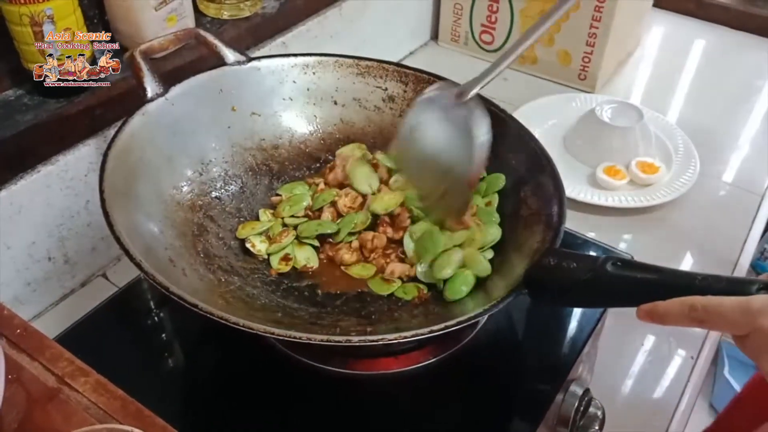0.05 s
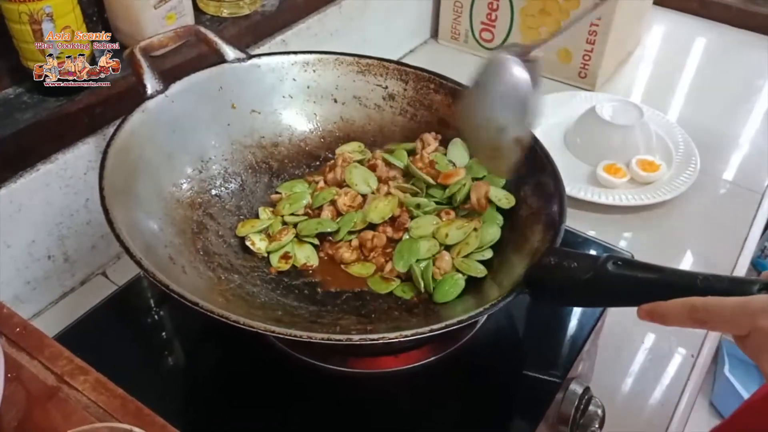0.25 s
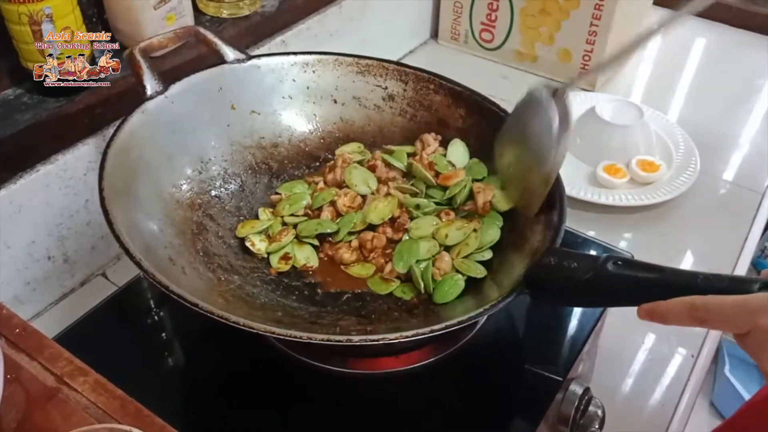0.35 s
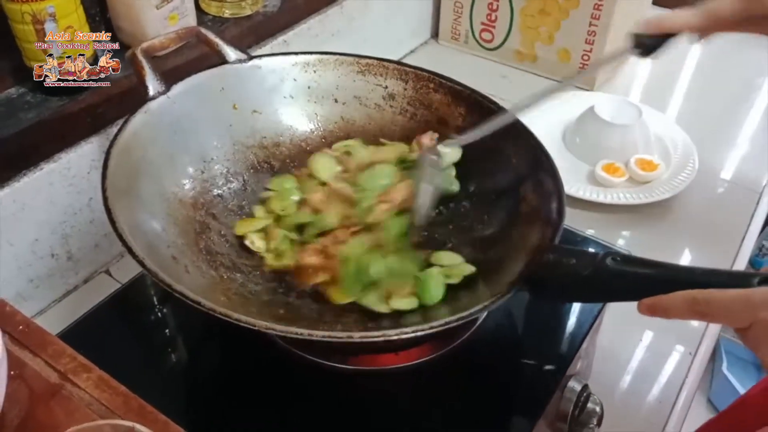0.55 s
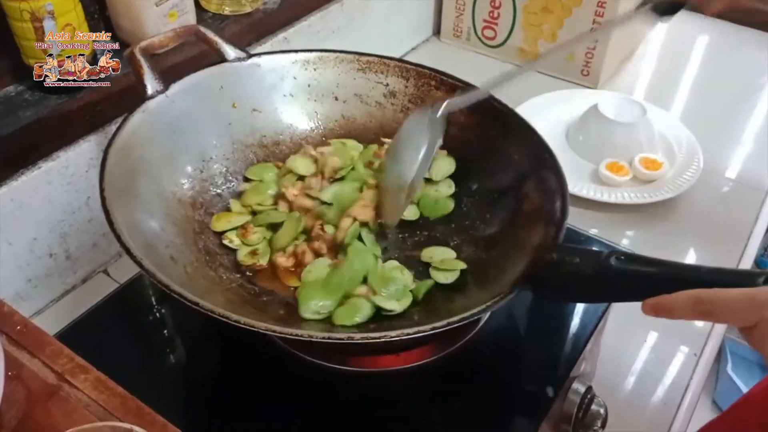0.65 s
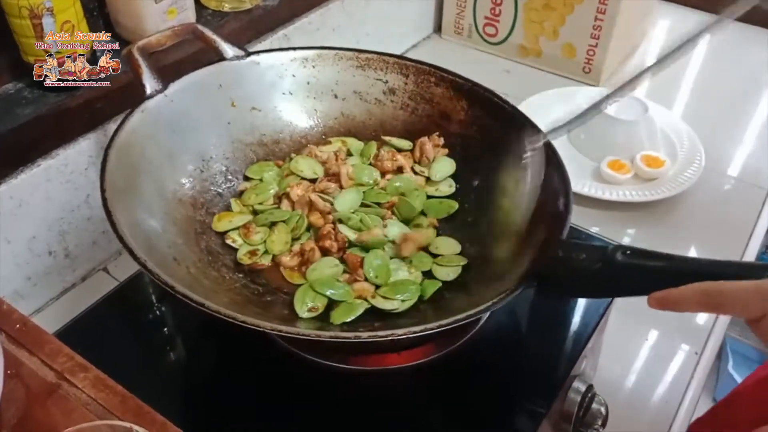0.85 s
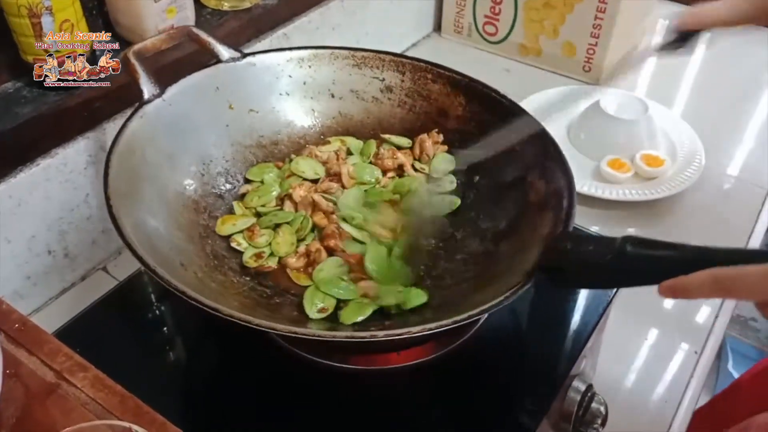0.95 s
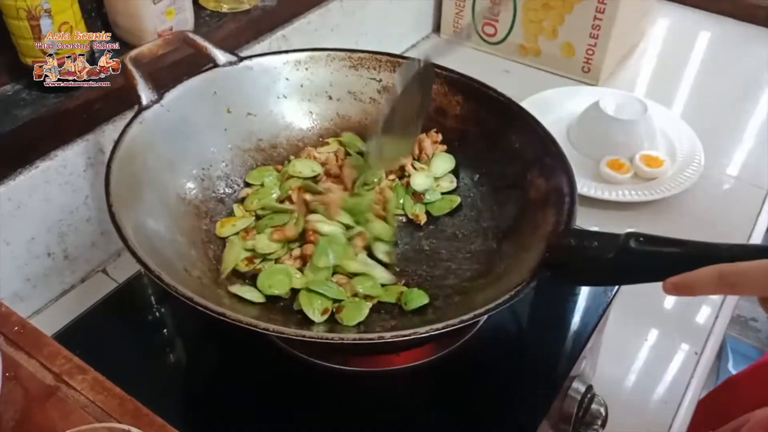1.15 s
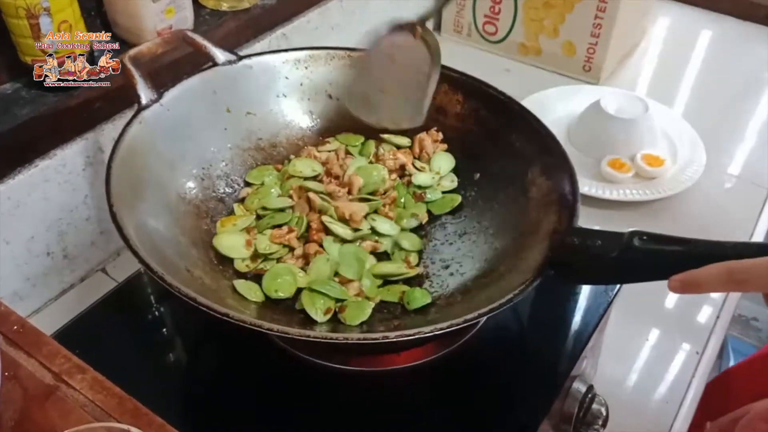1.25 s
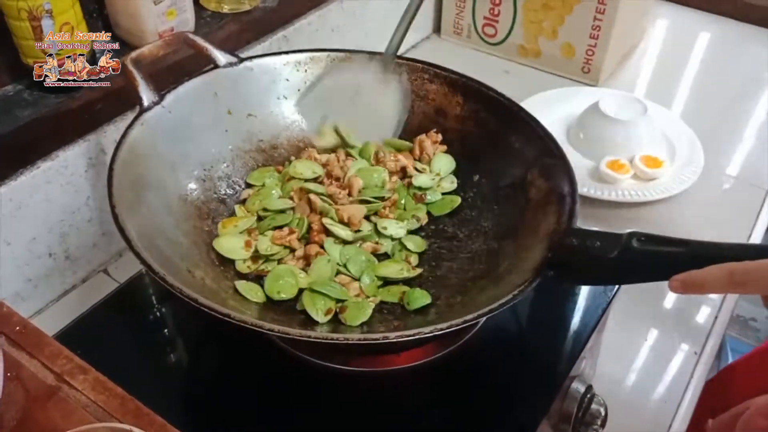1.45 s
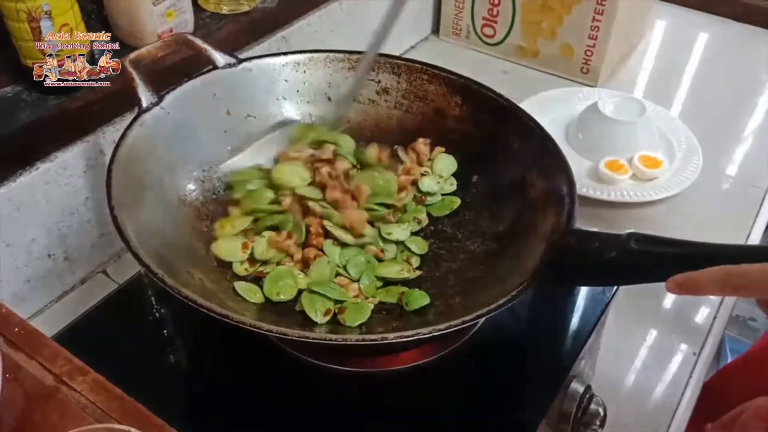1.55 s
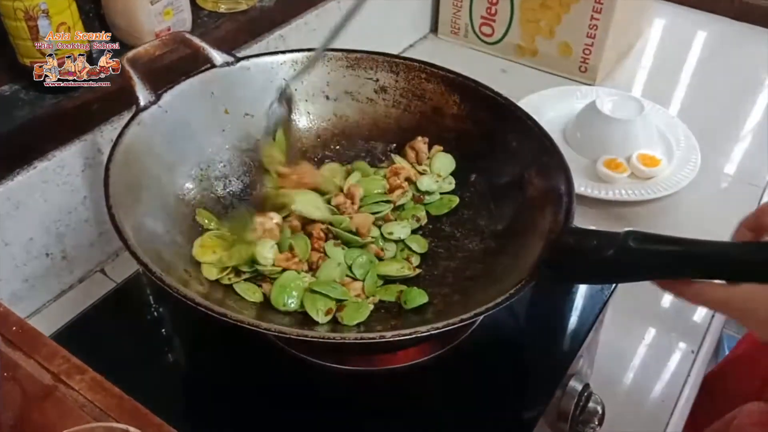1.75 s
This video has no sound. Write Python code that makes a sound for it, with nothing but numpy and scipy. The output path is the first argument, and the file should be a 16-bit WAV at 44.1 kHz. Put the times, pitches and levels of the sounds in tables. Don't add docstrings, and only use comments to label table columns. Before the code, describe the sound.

A metal spatula clanks and scrapes in a hot wok over a faint sizzle in a kitchen

```python
import sys
import numpy as np
from scipy import signal
from scipy.fft import rfft, irfft
from scipy.io import wavfile
from scipy.ndimage import uniform_filter1d

SR = 44100
rng = np.random.default_rng(int(sys.argv[2]) if len(sys.argv) > 2 else 0)


def volts(x):
    e = np.asarray(x, float) / 20
    return 10 ** e


def wav_record(signal):
    frames = np.transpose(np.atleast_2d(signal))
    bounded = np.clip(frames, -1, 1)
    quanta = np.round(bounded * 32767).astype(np.int16)
    wavfile.write(sys.argv[1], SR, quanta)


N = 79380


def evened(x):
    return x / np.sqrt(np.mean(x ** 2) + 1e-20)


def read(points, hz):
    f, value = np.transpose(points)
    return np.interp(np.log(hz + 1), np.log(f + 1), value)


def add(mix, start_s, sound):
    part = mix[round(start_s * SR):][:len(sound)]
    part += sound[:len(part)]


def coloured(x, points):
    gain_db = read(points, np.fft.rfftfreq(len(x), 1 / SR))
    return irfft(rfft(x) * volts(gain_db), len(x))


def drift(size):
    smooth = uniform_filter1d(rng.standard_normal(N), size)
    return evened(uniform_filter1d(smooth, size))


def resonate(x, hz, width_hz):
    r = np.exp(-np.pi * width_hz / SR)
    pole = r * np.exp(2j * np.pi * hz / SR)
    return 2 * signal.lfilter([1 - r], [1, -pole], x).real


def resonate_twice(x, hz, width_hz):
    return resonate(resonate(x, hz, width_hz), hz, width_hz)


def modes(hz, db, t60_s, size=22050):
    t = np.arange(size)[:, None] / SR
    sines = np.sin(2 * np.pi * (hz * t + rng.random(len(hz))))
    return (sines * volts(-60 * t / t60_s)) @ volts(db)


def crowd(count):
    u = (np.arange(count) + rng.random(count)) / count
    return 150 + 16400 * u ** 1.5, 5 * np.log10(u + .01)


def flattened(body):
    z = rfft(body)
    power = uniform_filter1d(abs(z) ** 2, size=25)
    return evened(irfft(z / np.sqrt(power + 1e-9), len(body)))


def blows():
    # start_s, peak_db, dull_share (0-1), ring_factor
    landings = [
        (0.2444, -1, 0.21, 0.19),
        (0.2508, -2.5, 0.46, 0.88),
        (0.7653, -1, 0.04, 0.25),
        (.772, -9.5, 0.86, 0.59),
        (1.1496, -2, 0.93, 0.65),
        (1.298, -2.5, 0.06, 0.49),
    ]
    spots = [0, 0, 1, 1, 2, 3]
    # freq_hz, level_db
    spot_modes = [
        [(680, -31.5), (1292, -33.5), (2670, -30), (6724, -24.5), (8796, -21), (9808, -18), (11493, -18.5)],
        [(632, -36), (1360, -45), (2950, -28), (1720, -27), (4900, -31), (6780, -26.5), (8177, -28),
         (9200, -23)],
        [(276, -33.5), (312, -35), (396, -36.5), (520, -42), (710, -21.5), (785, -28), (1090, -33), (1282, -24),
         (1340, -22), (1640, -30), (1710, -20), (2700, -22), (6385, -41), (6530, -20.5), (9044, -22.5)],
        [(307, -34), (760, -30), (1290, -28.5), (2271, -22.5), (4608, -30), (6525, -25)],
    ]
    # freq_hz, level_db_per_hz
    bright = [(100, -27), (400, -9.5), (1100, -7.5), (3800, -6.5), (9400, -1.5), (14500, 0.5), (15800, -31),
              (16500, -45)]
    # freq_hz, level_db_per_hz
    dull = [(100, -18), (250, -7), (700, -3), (1800, -8), (2100, -19.5), (6500, -9), (12500, -12),
            (16500, -22)]
    # freq_hz, t60_s
    bowl_ring = [(200, 0.37), (700, 0.32), (2000, 0.38), (5000, 0.23), (9000, 0.21), (15200, 0.04),
                 (15700, 0.018)]
    # freq_hz, factor
    line_ring = [(300, 1.28), (3000, 0.3), (6000, 0.62), (12000, 0.45)]
    # freq_hz, gain_db
    below_top = [(15400, 0), (15700, -70)]
    modes_db, crack_db, crack_s, top_s = -2.5, -2.5, 0.014, 0.004
    out, t = np.zeros(N), np.arange(11025) / SR
    for (start_s, peak_db, dull_share, ring), spot in zip(landings, spots):
        hz, even_db = crowd(count=450)
        colour_db = (1 - dull_share) * read(bright, hz) + dull_share * read(dull, hz)
        mode_db = colour_db + even_db + 2.5 * rng.standard_normal(len(hz))
        t60_s = ring * read(bowl_ring, hz) * rng.uniform(.4, 1.1, len(hz))
        body = modes(hz, mode_db, t60_s, size=len(t))

        line_hz, line_db = np.transpose(spot_modes[spot])
        line_t60_s = ring * read(line_ring, line_hz) * read(bowl_ring, line_hz)
        lines = modes(line_hz, line_db, line_t60_s, size=len(t))

        noise = coloured(rng.standard_normal(len(t)), np.transpose([hz, colour_db]))
        crack = evened(noise) * np.exp(-t / crack_s)

        sound = body / body[:900].std() + volts(modes_db) * lines / lines[:900].std() + volts(crack_db) * crack
        low = coloured(np.minimum(t / 0.0013, 1) ** 2 * sound, below_top)
        top = np.minimum(t / 0.0018, 1) ** 2 * sound - low
        add(out, start_s - .0008, volts(peak_db - 17.0) * (low + top * np.exp(-t / top_s)))
    return out


def drags():
    # time_s, level_db
    pressures = [
        [(.26, -29), (.31, -27), (.325, -22), (.39, -23.5), (.42, -30.5), (.47, -47.5), (.56, -65)],
        [(.775, -30), (.80, -28), (.85, -26), (.88, -33), (.92, -82), (.99, -80)],
        [(1.305, -35), (1.34, -27), (1.39, -23.5), (1.42, -30.5), (1.45, -33.5), (1.52, -42), (1.58, -93)],
    ]
    # freq_hz, level_db_per_hz
    colours = [
        [(59, -64), (100, -37), (291, -9.5), (1960, -8.5), (2800, -6), (3460, -9.5), (15000, -7.5)],
        [(100, -27), (300, 0.5), (1400, -4.5), (2800, -6), (9400, -4.5), (15000, -14)],
        [(100, -29), (300, -10), (650, -5.5), (1500, -8.5), (3000, -6.5), (6500, -1.5), (15000, -5.5)],
    ]
    # freq_hz, width_hz, level_db
    sung_modes = [
        [(1290, 100, -19), (1700, 140, -9), (297, 29, -1), (2810, 82, -26), (7600, 2900, 12)],
        [(557, 27, -27), (1520, 300, -7), (4540, 2200, 0), (8430, 270, -2), (8900, 200, -9)],
        [(306, 120, -10), (624, 66, 20.5), (1620, 26, 17), (6340, 130, 25.5), (8350, 140, -2)],
    ]
    slips_per_s, slip_spread_db, chatter_db = 8000, 3.2, 1.1
    drag_t60_s, sing_db = 0.03, -10.5
    out, t = np.zeros(N), np.arange(N) / SR
    for pressure, colour, sung in zip(pressures, colours, sung_modes):
        time_s, level_db = np.transpose(pressure)
        size_db = slip_spread_db * np.minimum(rng.exponential(1, N), 3)
        slips = volts(size_db) * (rng.random(N) < slips_per_s / SR)
        slips = slips * rng.choice([-1., 1.], N) * volts(chatter_db * drift(size=300))

        hiss = np.zeros(N)
        for k in range(3):
            hz, even_db = crowd(count=300)
            mode_db = even_db + 2.2 * rng.standard_normal(len(hz))
            body = modes(hz, mode_db, drag_t60_s, size=3072)
            at_spot = slips * np.cos(np.pi * (11 * t + k / 3))
            hiss += signal.oaconvolve(at_spot, flattened(body))[:N]

        song = np.zeros(N)
        for hz, width_hz, db in sung:
            tone = evened(resonate_twice(slips, hz, 1.04 * width_hz))
            song += volts(db + 2.7 * drift(size=700)) * tone

        gate = np.clip(np.minimum(t - time_s[0], time_s[-1] - t) / 0.03, 0, 1)
        scrape = evened(coloured(hiss, colour)) + volts(sing_db) * evened(song)
        out += gate * volts(np.interp(t, time_s, level_db)) * scrape
    return out


def squeals():
    # start_s, length_s, freq_hz, level_db
    catches = [(0.244, 0.016, 1790, -27.5), (0.248, 0.0089, 460, -34), (.247, 0.015, 660, -29.5),
               (.253, .014, 1107, -31), (.254, 0.019, 2036, -34), (.258, 0.024, 2666, -34.5),
               (.262, 0.041, 1290, -33), (0.281, 0.011, 748, -31.5), (0.306, 0.0073, 2660, -37),
               (0.308, 0.016, 757, -32), (0.317, 0.015, 1290, -34.5), (.32, .026, 2465, -32.5),
               (0.347, 0.025, 2299, -31), (0.348, 0.014, 2940, -44), (0.367, 0.034, 1715, -38.5),
               (.38, 0.0225, 498, -39.5), (0.766, 0.01, 1280, -26.5), (.782, 0.0093, 1654, -34),
               (.785, 0.016, 640, -36.5), (0.795, 0.023, 1420, -33), (0.821, 0.018, 1617, -34),
               (0.838, 0.006, 1330, -30), (.865, 0.0047, 498, -33.5), (0.879, .003, 3100, -32),
               (.772, 0.035, 8177, -40.5), (1.359, 0.039, 6340, -39), (1.368, .03, 8350, -42),
               (1.302, 0.0079, 2600, -32.5), (1.39, 0.017, 3250, -47.5), (0.247, 0.01, 9050, -22),
               (.325, 0.045, 6750, -35.5), (.32, 0.036, 11500, -40), (1.299, 0.014, 2337, -28),
               (1.30, 0.013, 761, -31.5), (1.315, 0.0079, 2270, -32), (1.322, 0.0082, 1290, -28),
               (1.326, 0.016, 307, -32), (1.332, 0.026, 2034, -27), (1.347, 0.021, 1290, -36.5),
               (1.353, 0.026, 1975, -30.5), (1.377, 0.028, 1610, -39.5), (1.384, 0.028, 2050, -35.5),
               (1.431, 0.014, 1080, -48.5), (1.432, 0.0062, 2100, -32), (1.441, 0.0097, 622, -39)]
    rise_s, t60_s, rough, width_hz = 0.0056, 0.025, .85, 300
    out, t = np.zeros(N), np.arange(4410) / SR
    for start_s, length_s, hz, db in catches:
        tone = np.sin(2 * np.pi * (hz * t + rng.random())) * np.sqrt(2)
        fuzz = evened(resonate_twice(rng.standard_normal(len(t)), hz, width_hz))
        shape = np.minimum(t / rise_s, 1) * volts(-60 * np.maximum(t - length_s, 0) / t60_s)
        add(out, start_s, volts(db) * shape * (tone + rough * fuzz))
    return out


def thuds():
    # start_s, peak_db, centre_hz
    landings = [(0.061, -28.5, 455), (0.088, -31, 355), (0.117, -43, 279), (0.52, -37.5, 251),
                (0.942, -36, 296), (0.992, -30, 291), (1.098, -39, 610), (1.725, -31, 262),
                (1.7489, -27, 514), (1.762, -28, 362), (1.774, -54, 268)]
    bowl_hz = (275, 308)
    mode_db = np.array([-5.5, -14.0, -4.0, -2.5, -31.0])
    t60_s = 0.15
    out, t = np.zeros(N), np.arange(6000) / SR
    for start_s, peak_db, hz in landings:
        f = np.array([*bowl_hz, hz, hz * 2.1, hz * 1.2])
        ring = modes(f, mode_db, t60_s * 300 / f, size=len(t))
        add(out, start_s, volts(peak_db - 8.0) * np.minimum(t / 0.00067, 1) * ring)
    return out


def spits():
    # start_s, peak_db, centre_hz
    bursts = [(0.0246, -25.5, 9200), (0.025, -29, 13500), (0.033, -31, 9500), (0.197, -20, 10300),
              (0.208, -32, 10000), (0.574, -31.5, 8100), (0.602, -30, 8200), (0.628, -30.5, 8600),
              (0.642, -28, 11900), (0.653, -32, 10800), (0.3195, -22, 2500), (0.8, -11.5, 2180),
              (0.933, -46, 12500), (0.962, -34, 12300), (0.974, -32, 10000), (0.987, -42, 10400),
              (0.991, -33, 12900), (0.998, -39, 9700), (1.009, -39.5, 9000), (1.04, -33, 14100),
              (1.108, -33, 10500), (1.136, -54, 12000), (1.435, -18, 3700), (1.6045, -30, 2500),
              (1.6048, -30, 13000), (1.6722, -28, 12750), (1.6725, -30, 2650), (1.697, -29.5, 2550),
              (1.707, -29, 2220), (1.786, -32, 11800)]
    t60_s, q = 0.13, 2.4
    out, t = np.zeros(N), np.arange(2205) / SR
    for start_s, peak_db, hz in bursts:
        noise = rng.standard_normal(len(t))
        noise[0] = 4
        burst = evened(resonate(noise, hz, hz / q)) + 0.35 * noise
        decay = np.exp(-t / 0.00024) + 0.4 * volts(-60 * t / t60_s)
        add(out, start_s, volts(peak_db - 10.0) * burst * decay)
    return out


def sizzle():
    # freq_hz, level_db_per_hz
    hiss_colour = [(25, -0.5), (60, -1), (250, -6), (700, -5.5), (1100, -6.5), (4500, -14), (8000, -11.5),
                   (15000, -10)]
    # time_s, level_db, simmer_db
    heat_curve = [(0, -39.5, -42), (.2, -40, -42), (.5, -40, -56), (0.652, -45.5, -50), (0.749, -40, -49.5),
                  (1.0, -41, -52.5), (1.14, -41.5, -57.5), (1.55, -42, -49.5), (1.679, -42, -56.5),
                  (1.8, -41, -56)]
    sizzle_db, simmer_hz, simmer_width_hz = -2.5, 2500, 1740
    pops_per_s, pops_db = 500, -15
    t = np.arange(N) / SR
    time_s, level_db, simmer_db = np.transpose(heat_curve)
    hiss = evened(coloured(rng.standard_normal(N), hiss_colour)) * volts(0.42 * drift(size=500))

    broad = resonate(rng.standard_normal(N), simmer_hz, simmer_width_hz)
    simmer = evened(resonate(broad, simmer_hz, simmer_width_hz) + 1.4 * broad)
    simmer_gain = volts(np.interp(t, time_s, simmer_db) + .6 * drift(size=300))

    clicks = volts(9 * np.minimum(rng.exponential(1, N), 3)) * (rng.random(N) < pops_per_s / SR)
    which = rng.integers(0, 8, N)
    pops = np.zeros(N)
    for k, hz in enumerate(np.geomspace(3000, 13000, 8)):
        pops += resonate(clicks * (which == k), hz, hz / 4)

    heat = volts(np.interp(t, time_s, level_db) + sizzle_db)
    return heat * (hiss + volts(pops_db) * evened(pops)) + simmer_gain * simmer


def kitchen(x):
    # freq_hz, t60_s
    room_decay = [(200, 0.58), (1500, 0.36), (6000, 0.32), (14000, 0.24)]
    taps = np.zeros(SR // 2)
    at = np.arange(200, SR // 2 - 20, 20)
    taps[at + rng.integers(0, 20, len(at))] = rng.choice([-1., 1.], len(at))
    hz, t, z = signal.stft(taps, SR, nperseg=256)
    decay = volts(-60 * t / read(room_decay, hz)[:, None])
    tail = signal.istft(z * decay, SR, nperseg=256)[1]
    return signal.fftconvolve(x, tail / np.linalg.norm(tail))[:N]


def scene():
    # freq_hz, gain_db
    steady_edge = [(9000, 0.5), (12500, -2.5), (15000, -8), (15420, -11), (15660, -75)]
    kitchen_db = -7
    hits, sung = blows(), squeals()
    rest = drags() + spits() + thuds()
    echo = volts(kitchen_db) * kitchen(hits + rest + 0.63 * sung)
    steady = coloured(rest + sung + echo + sizzle(), steady_edge)
    return (hits + steady)[None]


def low_pass(x):
    return signal.sosfilt(signal.butter(12, 16610, fs=SR, output="sos"), x)


def record(dry):
    mic_low_hz = 50
    high_pass = signal.butter(2, mic_low_hz, "high", fs=SR, output="sos")
    mix = signal.sosfilt(high_pass, dry)
    return low_pass(mix)


dry = scene()
out = record(dry)
wav_record(out)
```